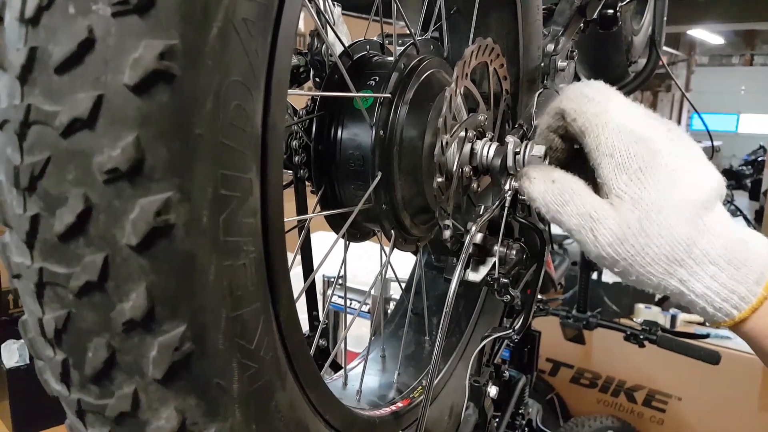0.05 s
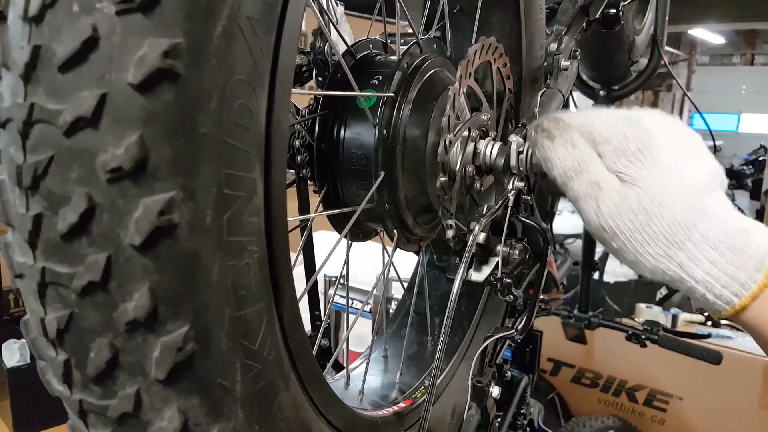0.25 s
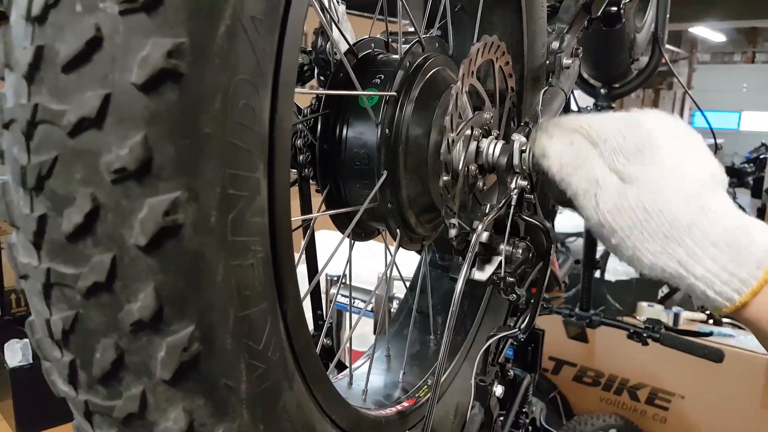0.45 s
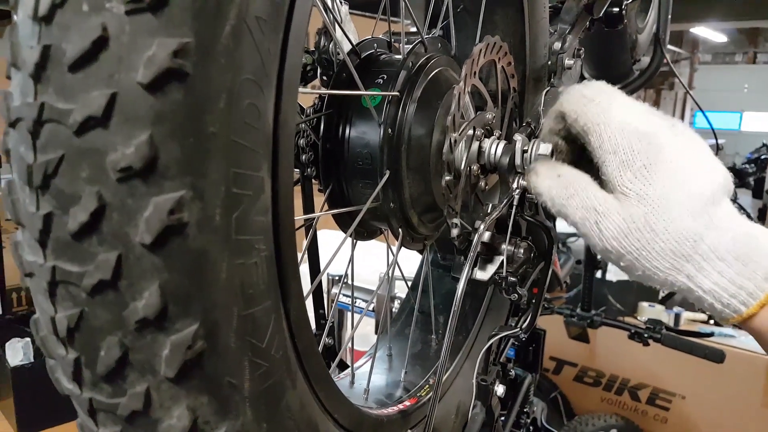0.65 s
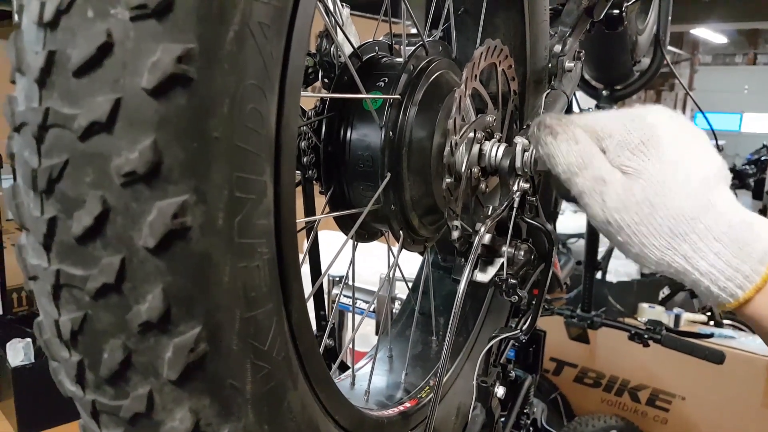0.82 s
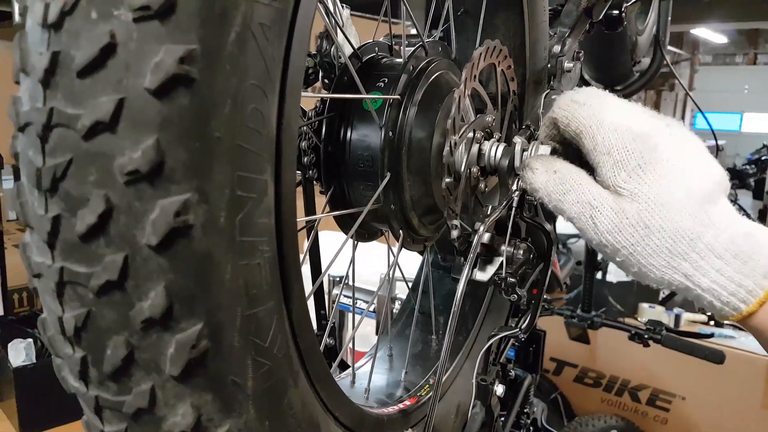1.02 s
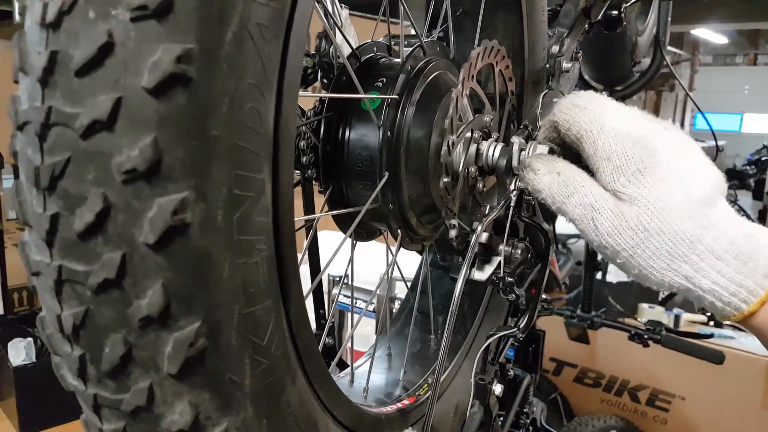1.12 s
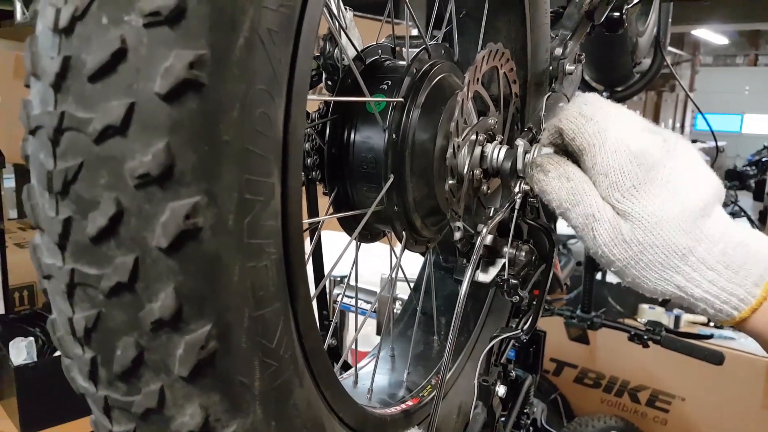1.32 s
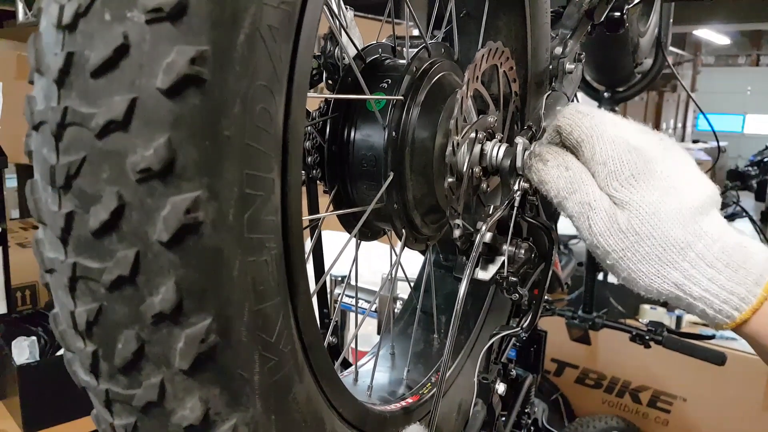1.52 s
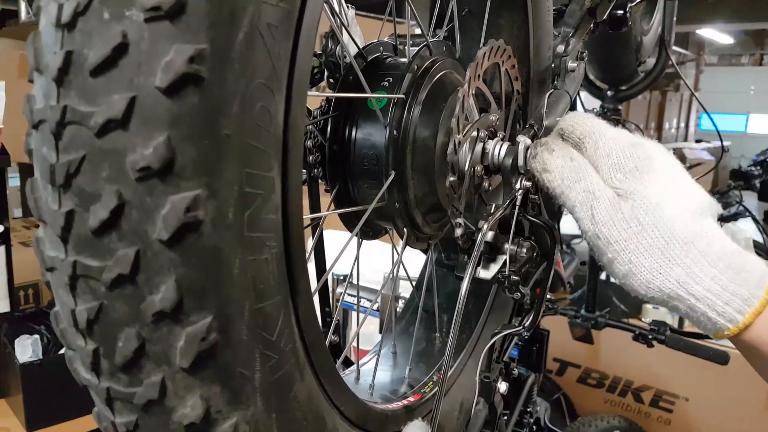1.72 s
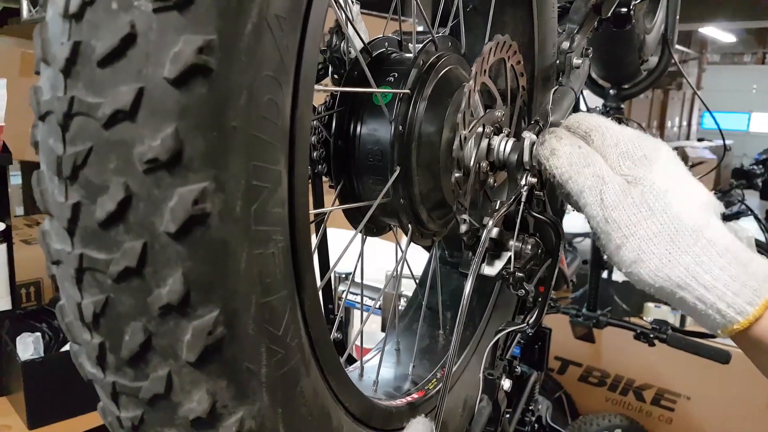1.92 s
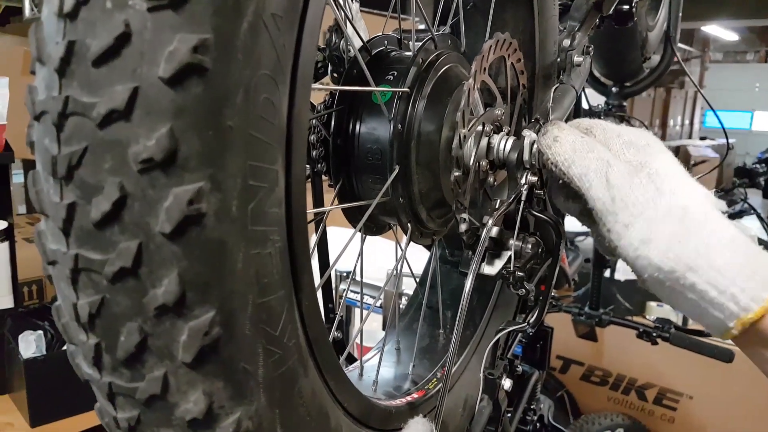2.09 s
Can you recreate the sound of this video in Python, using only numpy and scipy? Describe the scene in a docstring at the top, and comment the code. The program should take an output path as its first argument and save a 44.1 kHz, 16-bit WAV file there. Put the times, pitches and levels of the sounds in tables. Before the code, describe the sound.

A ratcheting metal click a few metres to the right runs in rapid bursts, then slower single clicks, with scrapes, a tiny squeak and soft thuds in an echoing workshop; one rub hits the right microphone.

```python
"""Workshop hall: a ratchet a few metres to the right clicks through four strokes.
Each tooth is a double tick, two chattering blows that ring small steel parts.
Dull thuds (low modes), a scrape (resonant grit) and a sliding squeak join it.
Beneath lie air, rumble and a faint hum; once, gritty noise rubs the right microphone port.
Apart from the hall's own sounds, two faint 14 kHz artefact chirps are drawn as decaying sines."""
import sys
import numpy as np
from scipy import signal
from scipy.fft import rfft, irfft
from scipy.io import wavfile
from scipy.ndimage import uniform_filter1d

SR = 44100
rng = np.random.default_rng(int(sys.argv[2]) if len(sys.argv) > 2 else 0)


def invert_db(level):
    """Linear amplitude ratio for a level in decibels (20 dB per decade), elementwise."""
    return 10 ** (np.asarray(level, dtype=float) / 20)


def materialize(psi):
    """Save the field psi as 16-bit PCM at rate SR to the path in sys.argv[1].

    A 1-D psi becomes a single channel; in a 2-D psi each row is a channel.
    """
    bounded = np.clip(np.atleast_2d(psi).T, -1, 1)
    quanta = np.round(bounded * 32767).astype(np.int16)
    wavfile.write(sys.argv[1], SR, quanta)


N = 94815

# Levels are relative; gains below and in scene() add to them.
# room air spectrum: pitch_hz, density_db
AIR_SPECTRUM = [(25, -3.5), (118, -3), (158, -9.5), (264, -8), (415, -11), (749, -18.5), (13800, -37.5)]
# swell of the air: time_s, gain_db
AIR_SWELL = [(.0, -4), (.085, -22), (.1, 0.5), (1.2, -1), (2.2, -6)]
# hum partials: pitch_hz, mean_peak_db
HUM = [(59, -69.5), (113, -74.5)]
# scrape effort: time_s, level_db
SCRAPE_EFFORT = [(0, -48.5), (.025, -40.5), (.05, -48), (.085, -102), (.2, -55), (.3, -43.5), (.36, -65),
                 (.6, -41.5), (.68, -97), (.82, -51), (.87, -46.5), (.95, -57), (1.05, -55.5), (1.1, -88)]
# resonances of the scraped body: pitch_hz, width_hz, level_db
SCRAPE_BODY = [(997, 130, 13), (1320, 2000, 20.5), (2860, 1900, 16)]
# hall decay: band_hz, t60_s
HALL_DECAY = [(300, 0.5), (800, 0.38), (2000, 0.57), (5000, 0.5), (12000, 0.32)]
# squeak path: time_s, level_db, pitch_hz
SQUEAK = [(0.01, -54, 1000), (0.028, -45, 1060), (0.05, -45, 860), (.07, -70, 804)]
# thuds: start_s, level_db, main_pitch_hz, upper_modes_db, lower_modes_db
THUDS = [(.086, -54, 200, 6, 7), (.385, -39, 180.5, -13, -26), (0.829, -42, 189, 3, 10.5),
         (1.224, -39.5, 203, -15, -14), (1.9, -36.5, 261, -7, 15)]
# thud mode pitches: ratio to the main pitch
THUD_RATIOS = (0.415, 0.894, 1, 1.66, 2.17, 2.72)
# ratchet teeth: start_s, level_db, treble_share_db, bass_share_db, body_pitch_hz
TEETH = [(0.096, -51, 18, -30, 2020), (0.117, -29, -3.5, -43, 3060), (0.143, -30, -29, -41, 3270),
         (0.1612, -30, -1, -43, 2420), (0.1839, -30.5, -14, -29, 2960), (0.199, -30.5, -7, -36, 2660),
         (0.2147, -27, -8, -51, 4850), (0.2339, -28.5, -13, -43, 2800), (0.2791, -34, 4, -25, 2860),
         (0.3167, -31, -8.5, -19, 2660), (0.4372, -21.5, -5.5, -22, 2100),
         (0.4758, -22.5, -7.5, -2.5, 3060), (0.5098, -21.5, -13, -6, 2570), (0.5436, -22, -4, -4, 2900),
         (0.5742, -19, -7, -7, 2740), (0.605, -21, -14, -20, 2860), (0.6374, -22.5, -8, -13, 2720),
         (0.6649, -22.5, -8, -2, 3400), (0.703, -21, -9, -6, 3170), (0.8753, -27.5, -4, -3, 3100),
         (0.903, -31, -32, -15, 3150), (0.9256, -30, 3, -21, 3250), (0.9464, -29, 11, -10, 3050),
         (0.9701, -29.5, -27, -22, 3100), (0.9965, -28.5, 10.5, -10, 3000), (1.031, -31, -1.5, -26, 3220),
         (1.2245, -44.5, -14, -21, 2810), (1.3074, -23.5, -4, -7, 2340), (1.3959, -24.5, -1.5, -24, 2370),
         (1.518, -25, -1.5, -8, 2470), (1.6447, -24.5, -1.5, -11, 2680), (1.7433, -25.5, -1, -3, 2640),
         (1.8144, -24.5, -0.5, -4, 3100), (1.8662, -23, -5.5, -1, 3100)]
# ratchet modes besides its body: pitch_hz, level_db, t60_s
STEEL_MODES = [(686, 5.5, 0.029), (860, 2, 0.022), (1320, -4.5, 0.016), (3100, 2.5, 0.0042),
               (4470, 14.5, 0.0037), (5440, 4, 0.0091), (5860, 3, 0.024), (6450, 11.5, 0.0063),
               (7380, 9, 0.0073), (8226, 5.5, 0.0078), (9700, 15.5, 0.0052), (11120, 6.5, 0.0029),
               (12100, 9, 0.0095), (12920, 2.5, 0.015)]
# rub effort: time_s, level_db
RUB_EFFORT = [(.7365, -87), (.7385, -29), (.744, -34), (.747, -22.5), (.764, -25.5), (.769, -27.5),
              (.785, -38), (.83, -54.5)]
# rub spectrum: pitch_hz, density_db
RUB_SPECTRUM = [(60, -35), (200, -2.5), (540, -10.5), (1000, -3), (2500, -6), (4800, -12), (7400, -25),
                (11300, -21.5), (14500, -29)]
# jolts within the rub: start_s, level_db
JOLTS = [(0.7359, -34.5), (0.7457, -27), (0.7529, -32), (0.7664, -24.5)]
# microphone case modes: pitch_hz, level_db, t60_s
CASE_MODES = [(101, 0.5, 0.023), (150, -1.5, 0.038), (540, -4, 0.028), (2100, 0.5, 0.018)]
# artefact chirps: start_s, level_db
CHIRPS = [(.8125, -51), (1.259, -46)]

AIR_DB, ALIKE_BELOW_HZ = -56.5, 500
RUMBLE_DB, RUMBLE_HZ, RUMBLE_SWELL_DB = -75, 99, 5.5
HALL_DB, HALL_GAP_S = 3, 0.00087
LEFT_DB, LEFT_LAG_SAMPLES = -1.05, 16
THUD_T60_S, THUD_SPREAD_S, THUD_ECHO_DB = 0.043, 0.043, -7
MODE_SCATTER_DB, MODE_JITTER_SHARE = 2.5, 0.025
BODY_DB, BODY_T60_S = 6.5, 0.015
LEAVING_TREBLE_DB, LANDING_RING_DB = 5, 6  # boosts above 9 kHz, and at 5-7 kHz
PAWL_LANDS_S, LANDING_DB = 0.0045, -1  # means, scattered per tooth
CHATTER_S, CHATTER_DB = 0.0026, 4
TOOTH_DB, TOOTH_ECHO_DB = -10.5, -2.5
SPREAD_RING_SHARE = 0.45  # share of t60 kept above 900 Hz in sound sent all round
CHIRP_HZ, CHIRP_T60_S = 14050, 0.035
TOP_HZ = 14750


def colour(x, table):
    """Shape a signal by a spectrum of pitch_hz, density_db; rms 1."""
    hz, db = np.array(table, float).T
    f = np.fft.rfftfreq(x.shape[-1], 1 / SR) + 1
    gain = invert_db(np.interp(np.log(f), np.log(hz), db))
    y = irfft(rfft(x) * gain, x.shape[-1])
    return y / np.sqrt(np.mean(y ** 2))


def curve(table):
    """Gain over time from time_s, gain_db; -200 dB outside."""
    s, db = np.array(table, float).T
    return invert_db(np.interp(np.arange(N) / SR, s, db, left=-200, right=-200))


def ring(hz, db, t60, t):
    """Sum of exponentially decaying sine modes."""
    decay = np.exp(-np.log(1000) * t / t60[:, None])
    return (invert_db(db)[:, None] * np.sin(2 * np.pi * hz[:, None] * t) * decay).sum(0)


def add(out, sound, s, db):
    """Place a sound with the given level, as energy over 10 ms."""
    i = int(s * SR)
    level = np.sqrt(np.sum(sound ** 2) / (0.01 * SR))
    out[i:i + len(sound)] += (invert_db(db) * sound / level)[:N - i]


def pair(n):
    """Two noises, alike in the bass and unrelated above."""
    mid, side = rng.standard_normal((2, n))
    high = signal.butter(1, ALIKE_BELOW_HZ, "high", fs=SR, output="sos")
    side = signal.sosfilt(high, side)
    return np.array([mid + side, mid - side]) / np.sqrt(2)


def air():
    """Coloured room air, a hum wavering in level and phase, and a low rumble that swells."""
    t = np.arange(N) / SR
    waver = rng.standard_normal((len(HUM) + 1, N))
    waver = uniform_filter1d(waver, 3000, axis=1) * np.sqrt(3000)  # rms about 1
    hum = sum(invert_db(db + w) * np.sin(2 * np.pi * hz * t + 0.66 * w)
              for (hz, db), w in zip(HUM, waver))
    octave = [RUMBLE_HZ / np.sqrt(2), RUMBLE_HZ * np.sqrt(2)]
    band = signal.butter(2, octave, "band", fs=SR, output="sos")
    low = signal.sosfilt(band, rng.standard_normal(N))
    rumble = invert_db(RUMBLE_DB + RUMBLE_SWELL_DB * waver[-1]) * low / low.std()
    room_air = invert_db(AIR_DB) * colour(pair(N), AIR_SPECTRUM)
    return hum + curve(AIR_SWELL) * (room_air + rumble)


def scrape():
    """Gritty friction excites the resonances of a hollow metal body."""
    grit = rng.standard_normal(N) * invert_db(4.5 * rng.standard_normal(N))
    body = sum(invert_db(db) * np.sqrt(500 / w) * signal.lfilter(*signal.iirpeak(hz, hz / w, SR), grit)
               for hz, w, db in SCRAPE_BODY)
    band = signal.butter(3, [500, 6500], "band", fs=SR, output="sos")
    body = signal.sosfilt(band, body)
    return curve(SCRAPE_EFFORT) * body / body.std()


def hall(x):
    """Dense echoes: a noise tail that dies band by band."""
    t = np.arange(SR) / SR
    noise, tail = rfft(pair(SR)), 0
    log_f = np.log(np.fft.rfftfreq(SR, 1 / SR) + 1)
    hz, t60 = np.array(HALL_DECAY, float).T
    for one_band, s in zip(np.eye(len(hz)), t60):
        band = irfft(noise * np.interp(log_f, np.log(hz), one_band), SR)
        tail = tail + band * np.exp(-np.log(1000) * t / s)
    tail = tail * np.clip(t / HALL_GAP_S - 1, 0, 1)  # silent gap, then fade in
    tail = tail / np.sqrt(np.sum(tail ** 2) / 2)
    return invert_db(HALL_DB) * signal.fftconvolve(x[None], tail, axes=1)[:, :N]


def squeak():
    """A tone of noisy amplitude that rises slightly, then slides down."""
    s, db, hz = np.array(SQUEAK, float).T
    rough = uniform_filter1d(rng.standard_normal(N), 400) * 20
    pitch_hz = np.interp(np.arange(N) / SR, s, hz)
    tone = np.sin(2 * np.pi * np.cumsum(pitch_hz) / SR)
    return curve(np.c_[s, db]) * (1 + 0.51 * rough) * tone


def thuds():
    """Heavy soft things set down: a scatter of contacts rings a few low modes."""
    out, t = np.zeros(N), np.arange(8192) / SR
    k = np.array(THUD_RATIOS)
    soft = signal.butter(2, [80, 760], "band", fs=SR, output="sos")
    for s, db, hz, upper_db, lower_db in THUDS:
        contact = rng.standard_normal(len(t)) * np.exp(-t / THUD_SPREAD_S)
        mode_db = np.where(k > 1, upper_db, np.where(k < 1, lower_db, 0))
        body = ring(hz * k, mode_db, THUD_T60_S / np.sqrt(k), t)
        thud = signal.fftconvolve(contact, np.diff(body))
        add(out, signal.sosfilt(soft, thud), s, db)
    return out


def chatter_hump(t):
    """Density of chatter after a contact: quick rise, Gaussian fall."""
    u = np.clip(t / CHATTER_S, 0, None)
    return np.sqrt(u) * np.exp(-u ** 2)


def blow(t, start_s, grit):
    """One contact: a sharp knock 0.8 ms after its start, amid chatter."""
    chatter = chatter_hump(t - start_s) * grit / np.linalg.norm(chatter_hump(t))
    knock = np.arange(len(t)) == int((start_s + 0.0008) * SR)
    return invert_db(CHATTER_DB) * chatter + knock


def ratchet():
    """The pawl leaves a tooth and lands on the next; returns direct and all-round sound."""
    out, t, contact_t = np.zeros((2, N)), np.arange(2048) / SR, np.arange(640) / SR
    hz, db, t60 = np.array(STEEL_MODES, float).T
    small = signal.butter(4, 600, "high", fs=SR, output="sos")
    for s, level_db, treble_db, bass_db, body_hz in TEETH:
        scatter, jitter = rng.standard_normal((2, len(hz)))
        grit = rng.standard_normal(len(contact_t))
        share_db = np.where(hz > 9000, treble_db, np.where(hz < 900, bass_db, 0))
        mode_db = np.append(db + MODE_SCATTER_DB * scatter + share_db, BODY_DB)
        f = np.append(hz * (1 + MODE_JITTER_SHARE * jitter), body_hz)
        mode_t60 = np.append(t60, BODY_T60_S)

        leaving_db = mode_db + LEAVING_TREBLE_DB * (f > 9000)
        landing_db = mode_db + LANDING_RING_DB * ((f > 5000) & (f < 7000))
        spread_t60 = mode_t60 * np.where(f > 900, SPREAD_RING_SHARE, 1)
        leaving = signal.sosfilt(small, ring(f, leaving_db, mode_t60, t))
        landing = signal.sosfilt(small, ring(f, landing_db, mode_t60, t))
        spread = signal.sosfilt(small, ring(f, mode_db, spread_t60, t))

        landing_s = PAWL_LANDS_S * (1 + 0.06 * jitter[1])
        tick = signal.fftconvolve(blow(contact_t, 0, grit), leaving)
        second = signal.fftconvolve(blow(contact_t, landing_s, grit), landing)
        tick = tick + invert_db(LANDING_DB + scatter[0]) * second
        add(out[0], tick, s - 0.0004, level_db + TOOTH_DB)
        add(out[1], spread, s, level_db + TOOTH_DB + TOOTH_ECHO_DB)
    return out


def rub():
    """Stick-slip rubbing straight on one port: gusty noise, with jolts that ring the case."""
    grit = rng.standard_normal(N) * invert_db(18 * uniform_filter1d(rng.standard_normal(N), 40))
    out = curve(RUB_EFFORT) * colour(grit, RUB_SPECTRUM)
    case = ring(*np.array(CASE_MODES, float).T, np.arange(4096) / SR)
    for s, db in JOLTS:
        add(out, -case, s, db)
    return out


def artefact_chirps():
    """Short 14 kHz artefacts, not hall sounds, each drawn as one decaying sine."""
    out, t = np.zeros(N), np.arange(4096) / SR
    chirp = ring(np.array([CHIRP_HZ]), np.zeros(1), np.array([CHIRP_T60_S]), t)
    for s, db in CHIRPS:
        add(out, chirp, s, db)
    return out


def scene():
    """Sources on the right reach the left port a little later and weaker."""
    (ticks, all_round), dull, rest = ratchet(), thuds(), scrape() + squeak()
    near = ticks + dull + rest + artefact_chirps()  # the chirps get the same lag, no echo
    direct = np.array([np.append(np.zeros(LEFT_LAG_SAMPLES), near)[:N], near])
    echoes = hall(all_round + invert_db(THUD_ECHO_DB) * dull + rest)
    room = (direct + echoes) * invert_db(np.array([[LEFT_DB], [0]]))
    right_only = np.array([[0], [1]])
    return room + air() + 2 * rub() * right_only


def roll_off(x):
    """The treble ends steeply here."""
    return signal.sosfilt(signal.butter(12, 15980, fs=SR, output="sos"), x)


def record(dry):
    """Small microphones lose the deep bass; a steep low-pass cuts the top."""
    bass_cut = signal.butter(2, 55, "high", fs=SR, output="sos")
    top_cut = signal.cheby1(12, 0.5, TOP_HZ, fs=SR, output="sos")
    mix = signal.sosfilt(top_cut, signal.sosfilt(bass_cut, dry))
    return roll_off(mix)


dry = scene()
out = record(dry)
materialize(out)
```